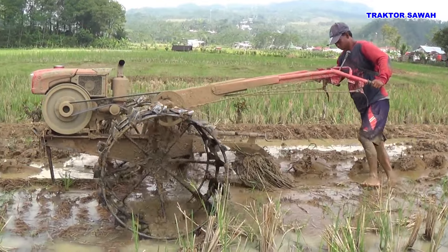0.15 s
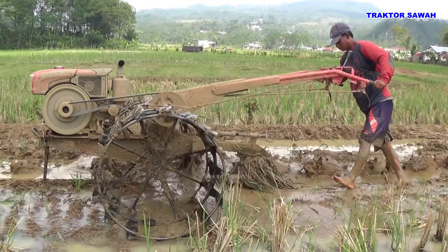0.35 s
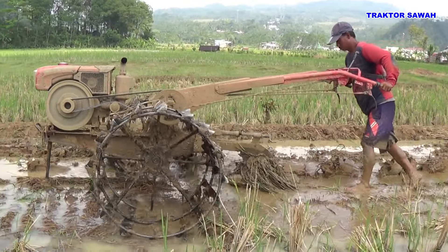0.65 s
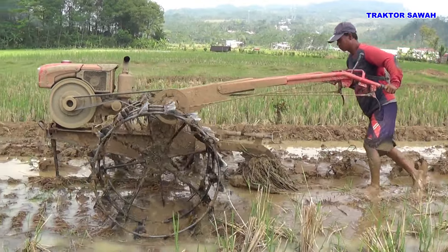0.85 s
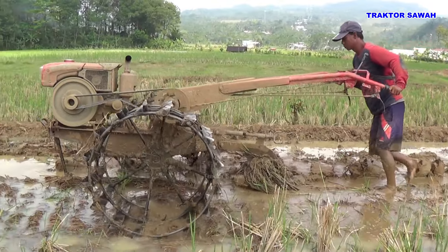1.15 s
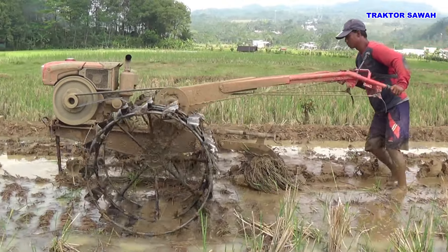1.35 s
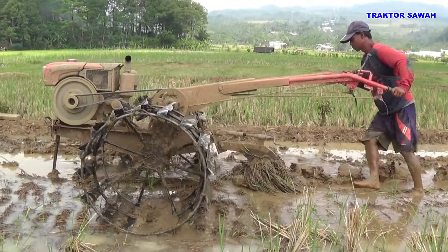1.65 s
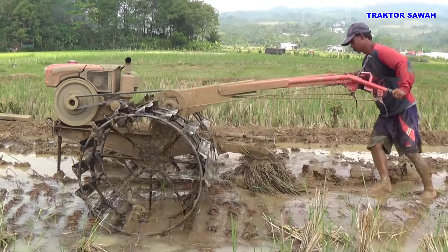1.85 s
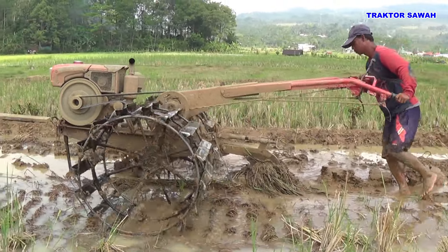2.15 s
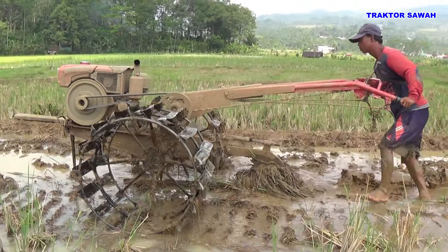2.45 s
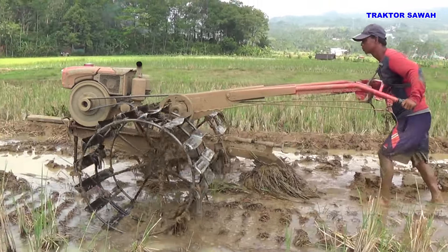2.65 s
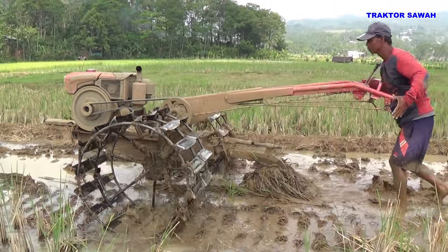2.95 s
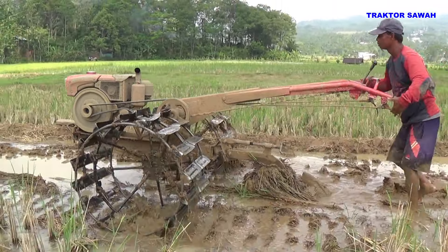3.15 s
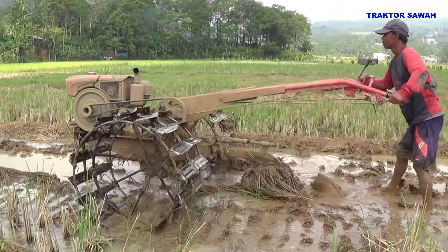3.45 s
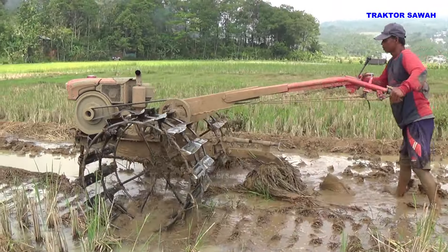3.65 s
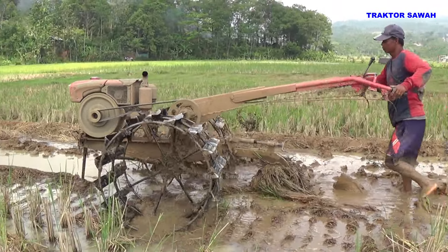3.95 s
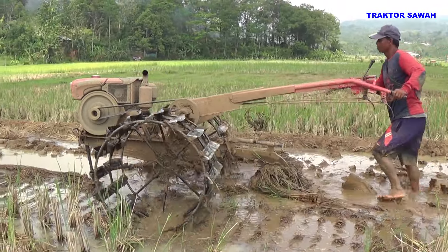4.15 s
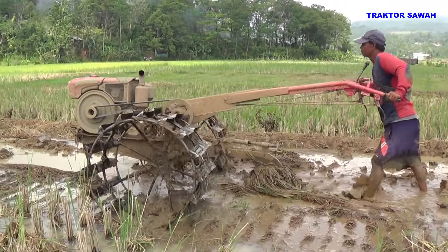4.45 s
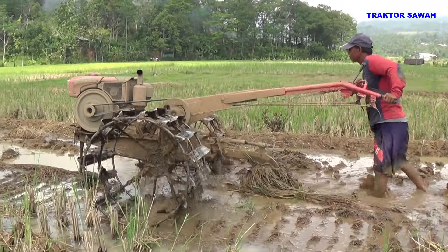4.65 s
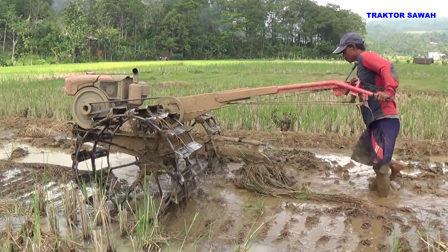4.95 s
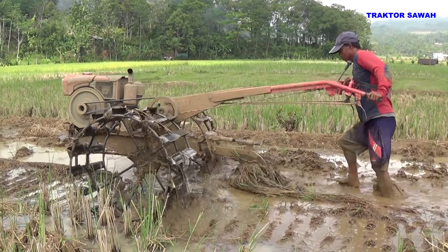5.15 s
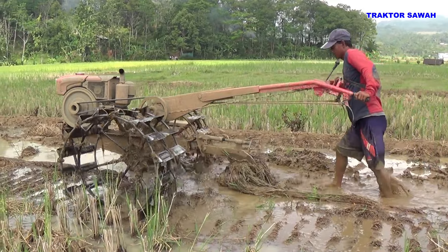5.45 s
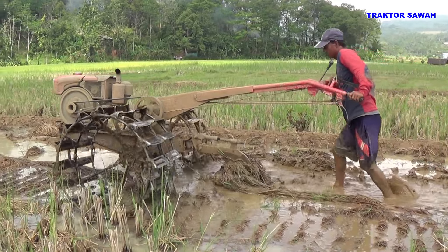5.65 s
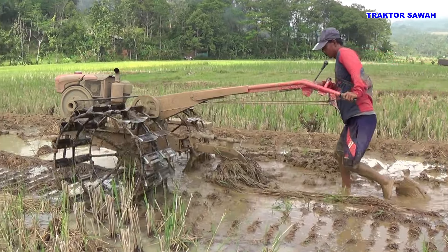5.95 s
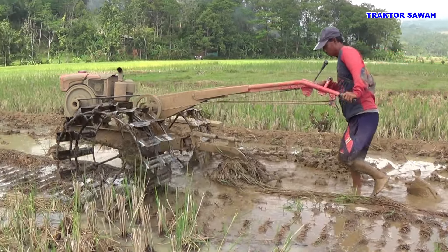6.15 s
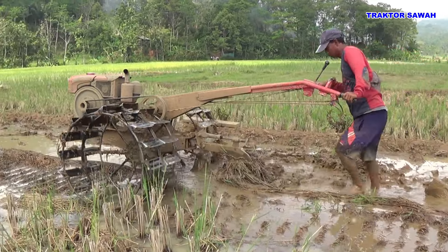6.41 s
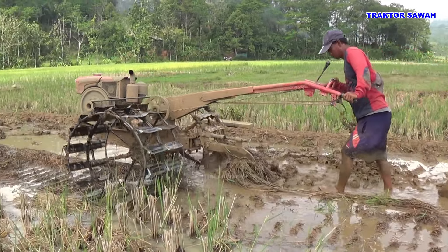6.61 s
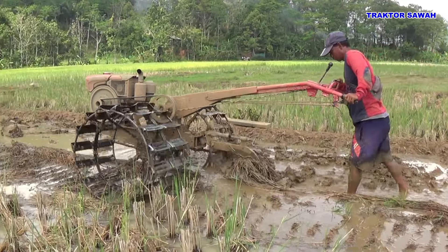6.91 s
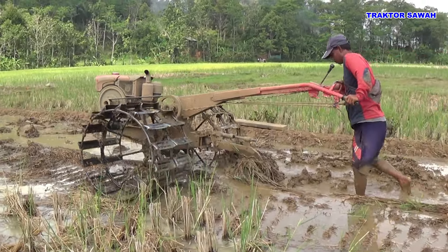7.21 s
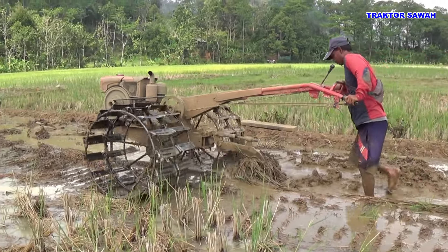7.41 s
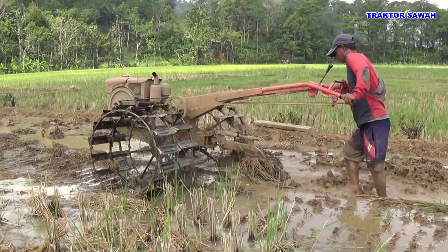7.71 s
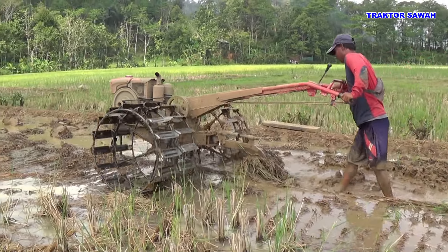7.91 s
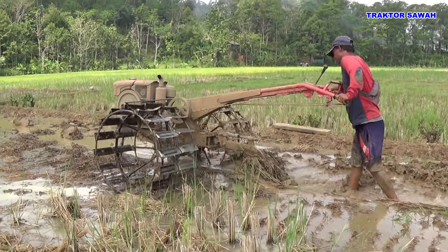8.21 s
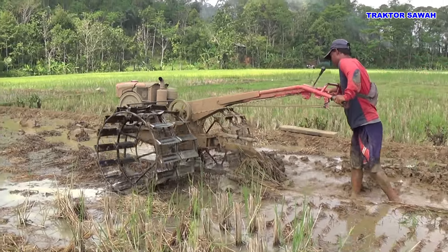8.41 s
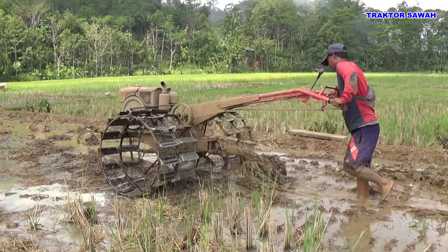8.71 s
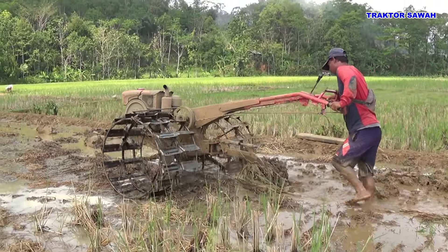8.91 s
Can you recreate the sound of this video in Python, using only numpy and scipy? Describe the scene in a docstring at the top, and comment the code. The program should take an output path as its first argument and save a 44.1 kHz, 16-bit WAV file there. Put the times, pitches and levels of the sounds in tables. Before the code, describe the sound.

Steady, fast chugging of a small one-cylinder diesel under load, already running and never stopping. Sharp combustion knocks alternate in strength above a rough bed of gear and valve-train clatter and a thin sheet-metal ring that slowly fades. Bursts of rattling steelwork cluster around three and four seconds; a clear clink follows near five. Intake gulps grow fuller towards the end. Open field, close microphone, almost no echo, light wind rumble.

```python
"""A hand tractor's single-cylinder four-stroke diesel labours through a flooded rice field, a few metres away.
From the start, filtered noise makes the clatter of gears and valve train, a sheet-metal ring and light wind.
About 6.7 times a second, mostly strong and weak by turns, the engine fires: enveloped tones and noise give
injector tick, knock, whistle, exhaust hiss and boom, then the gulp of the intake.
After a second and a half steelwork rattles in spells: random blows on noise, passed through steel resonances."""
import sys
import numpy as np
from scipy import signal
from scipy.fft import rfft, irfft, next_fast_len
from scipy.io import wavfile

SR = 44100
rng = np.random.default_rng(int(sys.argv[2]) if len(sys.argv) > 2 else 0)


def unload_audio(sound):
    """Save the sound as a 16-bit wav file, at the path given as the first command line argument."""
    columns = np.transpose(np.atleast_2d(sound))
    # keep every value between -1 and 1, then stretch to whole-number steps
    steps = np.round(np.clip(columns, -1, 1) * 32767)
    wavfile.write(sys.argv[1], SR, steps.astype(np.int16))


N = 399987
TIME = np.arange(N) / SR
AGE = np.arange(SR // 12) / SR  # time since a valve or a flame set something going, s

# Levels are relative: the functions add the state of each firing and fixed offsets.
# Wind spectrum: pitch_hz, density_db (per Hz)
WIND_SPECTRUM = [(15, -4), (40, 0), (80, -4), (200, -14), (600, -35), (2000, -70)]
# Gear noise, and treble noise of the valve train: pitch_hz, density_db (per Hz)
GEAR_SPECTRUM = [(100, -10), (180, -3), (290, -8), (410, -16.5), (520, -7), (680, -3), (780, -.5),
                 (920, -1.5), (1090, -10), (1350, -2.5), (1520, -7), (1900, -10), (2500, -10), (4000, -18),
                 (6000, -35)]
CHATTER_SPECTRUM = [(2000, -25), (3800, 0), (5000, .5), (6300, 0), (7500, -3.5), (9000, -1), (10200, 1),
                    (12000, -4.5), (14000, -15), (15800, -32)]
# Course of the clatter: time_s, body_db, treble_db
CLATTER_LEVEL = [(0.0, -26, -31), (0.68, -27, -35), (1.77, -26, -34), (2.09, -27, -35), (2.75, -25, -32),
                 (3.26, -26, -29), (3.71, -27, -36), (4.02, -25, -35), (4.14, -26, -32), (4.77, -28, -37),
                 (5.48, -29, -35), (6.29, -28, -37), (6.82, -29, -35), (9.07, -28, -37)]
# Steady ring of the engine's sheet metal: pitch_hz, density_db (per Hz)
PANEL_SPECTRUM = [(1000, -60), (1270, -12), (1355, 0), (1440, -12), (1800, -60)]
# The ring fades as the tractor moves on: time_s, level_db
PANEL_LEVEL = [(0, -33), (4.2, -33.5), (5.5, -39), (9.07, -44)]
# Resonances of thin steel parts: pitch_hz, width_hz, level_db
STEEL_MODES = [(4365, 60, -6), (6526, 30, -1), (7600, 50, -5), (8700, 70, -4), (9340, 60, -1),
               (10450, 60, -3), (11200, 60, -5), (12098, 30, -4), (13675, 25, 0), (13930, 40, -2)]

# Engine speed, sagging as the wheels dig in and surging as they come free: time_s, speed (firings per s)
SPEED = [(0.0, 6.686), (1.16, 6.539), (1.83, 6.702), (2.64, 6.637), (3.5, 6.797), (3.67, 7.193),
         (4.31, 6.666), (4.46, 6.892), (4.77, 6.749), (6.46, 6.774), (6.63, 6.915), (6.78, 6.702),
         (9.07, 6.613)]
# The governor hunts, overfeeding one firing and starving the next:
# time_s, depth (above 0 the even firings are strong, below 0 the odd)
HUNTING = [(0, .55), (.45, .8), (.8, .35), (1.9, 1), (2.8, .7), (3.45, .75), (3.75, 1.1), (3.9, .1),
           (4.5, 0), (4.76, -1.2), (5.06, -1), (5.36, -.25), (6, -1), (6.6, -1.15), (8.05, -.95),
           (8.35, -.5), (9.07, -.5)]
# Hardness of ignition: time_s, knock_db
HARDNESS = [(0, -15.5), (1.15, -15.5), (1.4, -17.7), (2.8, -17), (3.5, -19.5), (3.9, -16), (5.4, -15),
            (6.0, -18), (7.5, -17), (9.07, -17.3)]
# Load on the engine: time_s, power_stroke_db
LOAD = [(0, -22), (.33, -16.5), (.65, -16.5), (1.1, -21), (2.7, -22.5), (3.3, -25), (4.3, -26.5),
        (4.85, -22), (5.6, -29), (6.35, -22), (6.7, -25), (8.5, -24.5), (8.8, -21.5)]
# The intake turns towards the listener as the tractor passes: time_s, level_db
FACING = [(0, -3.5), (3, -3), (4, -1), (6, 0), (7.5, 1.5), (9.07, 3.5)]

# Resonances rung once a cycle:
# start_s (after firing), rise_s, hold_s, decay_s, pitch_hz, glide (Hz/s), width_hz, level_db
INJECTOR_MODES = [(-.006, .002, .004, .003, 10300, 0, 700, -37),
                  (-.006, .002, .004, .003, 12200, 0, 800, -41),
                  (-.006, .002, .004, .003, 14000, 0, 800, -44)]  # tick just before the firing
KNOCK_MODES = [(0, .0013, .005, .009, 1625, -7500, 70, .3), (0, .0015, .006, .007, 2750, 0, 100, -10),
               (0, .001, .003, .006, 3100, 0, 250, -18), (0, .002, .005, .011, 2050, 0, 300, -11),
               (.0005, .001, .005, .007, 860, 0, 90, -12), (.004, .004, .009, .012, 1320, 0, 60, -10)]  # combustion knock
WHISTLE_MODES = [(.012, .009, .008, .002, 2180, 3500, 60, -1),
                 (.011, .008, .009, .002, 4230, 10000, 110, -6)]  # tones that grow through the power stroke
HOUSING_MODES = [(.024, .005, .004, .01, 790, 0, 70, -25), (.094, .006, .008, .008, 840, 0, 60, -27.5),
                 (.036, .004, .004, .008, 3600, 0, 200, -36), (.06, .006, .008, .008, 2450, 0, 200, -38)]  # housing and valve gear
SPRING_MODES = [(.034, .001, .005, .007, 9500, 0, 500, -5), (.034, .001, .005, .006, 10900, 0, 600, -7),
                (.034, .001, .004, .005, 5800, 0, 300, -11)]  # valve gear and springs after the exhaust opens
INTAKE_BARK = [(.075, .002, .003, .004, 780, 0, 130, -21), (.078, .002, .003, .004, 560, 0, 100, -32)]
# Air columns: start_s (after firing), rise_s, hold_s, decay_s, first_hz, last_hz, level_db
EXHAUST_BOOM = (.037, .013, .006, .02, 70, 130, -21.2)
INTAKE_GULP = (.0778, .002, .004, .004, 215, 255, -22)
INTAKE_RING = (.118, .007, .002, .015, 156, 151, -25.5)
# Burning gas, exhaust jet and injection pump: pitch_hz, density_db (per Hz)
BURN_SPECTRUM = [(300, -35), (600, -10), (900, -3), (1100, -6), (1500, 1), (3000, -4), (4500, -11),
                 (7000, -21), (10000, -20), (15000, -38)]
BLOWDOWN_SPECTRUM = [(500, -30), (1500, -6), (2600, -1), (4700, -11), (5800, -4), (7100, -16), (8400, -4),
                     (9800, 0), (11500, -4), (13000, -13), (15500, -28)]
PUMP_SPECTRUM = [(900, -25), (1600, -3), (2250, 0), (3000, -9), (5000, -16), (7500, -20), (10300, -11),
                 (13000, -19), (15500, -27)]

# Spells of rattling steelwork: start_s, hold_s, level_db
RATTLE_SPELLS = [(1.58, .05, -29), (2.05, .02, -28), (2.46, .05, -25), (2.77, .08, -21), (2.87, .09, -24),
                 (3.07, .065, -18), (3.2, .03, -22), (3.24, .05, -26), (3.395, .028, -21),
                 (3.437, .032, -19), (3.497, .014, -19), (3.95, .04, -25), (4.012, .03, -17),
                 (4.06, .055, -21)]
# Rattle noise: pitch_hz, density_db (per Hz)
RATTLE_SPECTRUM = [(300, -20), (600, -4), (950, 1), (1150, -3), (1400, 0), (2000, -4), (3300, -5),
                   (5000, -9), (7500, -12), (10200, -6), (12500, -13), (15500, -26)]
# Single ticks of steel: start_s, level_db
CLINKS = [(2.5646, -18), (4.8214, -24), (5.1078, -11), (7.1044, -23), (8.1144, -27), (8.2494, -20)]

# Level difference of the two ports: pitch_hz, left_minus_right_db
LEAN = [(60, 0.0), (110, 0.5), (200, 0.5), (380, 0.0), (700, 3.0), (1290, 2.0), (2380, 1.3), (4400, 0.0),
        (8120, 0.5), (15000, 0.0)]
# Phase by which the left port leads: pitch_hz, lead_rad
LEAD = [(30, .3), (70, .7), (120, .85), (260, .75), (520, .65), (1030, .25), (1300, .4), (2500, .1),
        (15000, 0)]
# Sound thrown back from the sides: pitch_hz, level_db
SCATTER = [(60, -22), (250, -22), (700, -20), (3000, -16), (10000, -20)]

FIRING_COUNT, FIRST_FIRING_S = 61, .012
STARVED_KNOCK_DB, STARVED_STROKE_DB = -5, -5.5  # what a fully starved firing loses
# relative exhaust hiss of an evenly fed firing, and its change with the charge
HISS_DB, OVERFED_HISS_DB, STARVED_HISS_DB = -22.7, 3.8, -9.3
HURRY_S = .007  # a strong firing spins the crank up, so the starved one after it comes early
STARVED_LAG_S = .003  # extra ignition lag of a starved charge
USUAL_SPEED, LAG_S_PER_SPEED = 6.7, .01  # firings per s; a faster engine lights later
SLOW_CRANK_S, QUICK_CRANK_S = .0065, .0018  # valves move later when starved, earlier when full
LOW_CUT_HZ = 33  # the pipes are too small to radiate below this
TOP_HZ = 15800


def amp(db):
    """Decibels are a logarithmic measure of amplitude: convert to gain."""
    return 10 ** (np.asarray(db) / 20)


def unit(x):
    """Mean power fixes the effective amplitude: scale to rms 1."""
    return x / np.sqrt(np.mean(np.abs(x) ** 2) + 1e-20)


def along(points, hz):
    """Pitch is logarithmic in frequency: read (Hz, value) points on a log axis."""
    point_hz, value = np.transpose(points)
    return np.interp(np.log(hz + 1), np.log(point_hz), value)


def at_times(curve, s):
    """Linear interpolation: read (s, value) points at the given times."""
    return np.interp(s, *np.transpose(curve))


def filtered(x, response):
    """Linear filtering: multiply the spectrum of x by a complex response of frequency."""
    n = x.shape[-1]
    m = next_fast_len(n + 2048)
    return irfft(rfft(x, m) * response(np.fft.rfftfreq(m, 1 / SR)), m)[..., :n]


def wobble(rate, shape):
    """Slow random modulation: wandering curves of rms 1, with rate knots a second."""
    at = np.arange(np.prod(shape)) * (rate / SR)
    knots = rng.standard_normal(int(at[-1]) + 2)
    return unit(np.interp(at, np.arange(len(knots)), knots)).reshape(shape)


def noise(spectrum, grain_db):
    """Shaped random noise of rms 1, its amplitude modulated in millisecond grains."""
    grains = rng.standard_normal(N) * amp(grain_db * wobble(700, N))
    return unit(filtered(grains.astype(np.float32), lambda hz: amp(along(spectrum, hz)).astype(np.float32)))


def gate(rise, hold, decay, t=AGE):
    """Exponential damping: an envelope that opens, holds and dies away."""
    return np.clip(t / rise, 0, 1) * np.exp(-np.maximum(t - rise - hold, 0) / decay)


def vary(spread):
    """Cycle-to-cycle scatter: one random value for each firing."""
    return spread * rng.standard_normal((FIRING_COUNT, 1))


def place(sounds, times):
    """Superposition: sum short sounds, each at its time."""
    out = np.zeros(N + 2 * SR)  # a second to spare at each end
    for sound, s in zip(sounds, np.ravel(times)):
        out[SR + round(s * SR):][:len(sound)] += sound
    return out[SR:SR + N]


def air_column(times, level_db, pipe, settle):
    """Pipe resonance: a pressure wave swings in a pipe, its pitch settling as the valve moves."""
    start, rise, hold, decay, first_hz, last_hz, db = pipe
    turns = last_hz * AGE + (first_hz - last_hz) * settle * (1 - np.exp(-AGE / settle))
    swing = np.sin(2 * np.pi * turns * (1 + vary(.012)))
    return place(np.sqrt(2) * amp(db + level_db) * gate(rise, hold, decay) * swing, times + start)


def ring(times, level_db, modes, rough, spread_db):
    """Modal resonance: gliding tones, a little different in pitch and strength at every firing."""
    out, t = 0, AGE[:SR // 20]
    for start, rise, hold, decay, hz, glide, width_hz, db in modes:
        phase = 2 * np.pi * ((hz + vary(width_hz / 2)) * t + glide * t * t / 2) + vary(np.pi)
        tone = np.sin((phase + rough * wobble(3 * width_hz, phase.shape)).astype(np.float32))
        level = amp(db + level_db + vary(spread_db))
        out = out + place(level * gate(rise, hold, decay, t) * tone, times + start)
    return np.sqrt(2) * out


def taps(rate, spread_db, decay):
    """Random impacts: envelope, rms 1, of parts striking each other rate times a second."""
    chance = rng.random((int(rate * N / SR), 2))
    blows = np.bincount((chance[:, 0] * N).astype(int), amp(spread_db * chance[:, 1]), N)
    return unit(signal.lfilter([1], [1, -np.exp(-1 / (decay * SR))], blows))


def steel(x, ring_db):
    """Forced resonance: thin steel parts add their high modes to whatever shakes them."""
    def response(hz):
        modes = sum(amp(db) * 1j * hz * width / (centre ** 2 - hz ** 2 + 1j * hz * width)
                    for centre, width, db in STEEL_MODES)
        return 1 + amp(ring_db) * modes
    return filtered(x, response)


def firings():
    """Governor hunting: time, starvation (0 to about 1) and hiss dB of each firing."""
    number = np.arange(FIRING_COUNT)[:, None]
    firings_so_far = np.cumsum(at_times(SPEED, TIME)) / SR
    due = FIRST_FIRING_S + np.interp(number, firings_so_far, TIME)
    charge = at_times(HUNTING, due) * (-1) ** number
    overfed, starved = np.maximum(charge, 0), np.maximum(-charge, 0)
    hiss_db = HISS_DB + OVERFED_HISS_DB * overfed + STARVED_HISS_DB * starved
    return due - HURRY_S * starved, starved, hiss_db


def wind():
    """Turbulence: low noise of slowly wandering level, independent at the two ports."""
    level = amp(-57 + 4.5 * wobble(5, (2, N)))
    return level * np.array([noise(WIND_SPECTRUM, grain_db=1) for port in range(2)])


def clatter():
    """Impact noise: gears and valve train, shaken hardest after a strong power stroke."""
    s, body_db, treble_db = np.transpose(CLATTER_LEVEL)
    fired, _, hiss_db = firings()
    shake = place(amp(.45 * (hiss_db + 24) + vary(1.5)) * gate(.015, .04, .014), fired + .016)
    # the intake valve seats
    tappet = place(amp(vary(3)) * gate(.001, .002, .004), fired + .123 + vary(.003))
    body = amp(np.interp(TIME, s, body_db) - .7) * (1 + .5 * shake) * noise(GEAR_SPECTRUM, grain_db=1.8)
    ticking = .65 + .45 * taps(rate=120, spread_db=18, decay=.006)
    ticking = ticking * (1 + .75 * shake + .8 * tappet)
    treble = amp(np.interp(TIME, s, treble_db) - 2.8) * ticking * noise(CHATTER_SPECTRUM, grain_db=1.3)
    return body + steel(treble, ring_db=2.5)


def panel():
    """Plate resonance: the engine's sheet metal rings as narrow-band noise."""
    return amp(at_times(PANEL_LEVEL, TIME)) * noise(PANEL_SPECTRUM, grain_db=1)


def injector(s, weak):
    """Impact: the injector ticks just before each firing, louder before a weak one."""
    return ring(s, -5 + 6 * weak, INJECTOR_MODES, rough=.9, spread_db=3)


def knock(flame, knock_db):
    """Impulsive excitation: the sudden flame rings the combustion resonances."""
    return ring(flame, knock_db, KNOCK_MODES, rough=.5, spread_db=1.6)


def burn(flame, knock_db, stroke_db):
    """Combustion roar: gas rushes in a short burst, then through the power stroke."""
    burst = amp(knock_db - 9.5) * gate(.0005, .002, .003)
    push = amp(np.minimum(stroke_db, -24) - 1) * gate(.002, .026, .003)
    return place(burst + push, flame) * noise(BURN_SPECTRUM, grain_db=1.5)


def whistle(s, weak, stroke_db):
    """Gas resonance: rising tones, which fall away steeply below the hardest power strokes."""
    level_db = stroke_db + 1.4 * np.minimum(stroke_db + 20, 0) + .8
    low = ring(s, level_db + 2 * weak, WHISTLE_MODES[:1], rough=.3, spread_db=1.5)
    high = ring(s, level_db - 15 * weak, WHISTLE_MODES[1:], rough=.2, spread_db=1.5)
    return low + high


def housing(late, weak):
    """Structural resonance: housing and valve gear are rung once a cycle."""
    return ring(late, 1.5 * weak, HOUSING_MODES, rough=.6, spread_db=2.2)


def exhaust_hiss(s, hiss_db):
    """Jet noise: the valve cracks open, then the piston pushes the rest of the gas out."""
    jet = gate(.001, .007, .003) + amp(-18) * gate(.012, .01, .022)
    return place(amp(hiss_db + 1) * jet, s + .033) * noise(BLOWDOWN_SPECTRUM, grain_db=1.2)


def springs(s, hiss_db):
    """Free vibration: valve gear and springs jingle after the exhaust opens."""
    return ring(s, hiss_db, SPRING_MODES, rough=.8, spread_db=2)


def exhaust_boom(s, weak, facing_db):
    """Pipe resonance: the exhaust column booms at rising pitch, swinging negative first."""
    return -air_column(s - .0005 * weak, .2 * facing_db + vary(.6), EXHAUST_BOOM, settle=.019)


def intake(late, facing_db):
    """Pipe resonance: the intake barks and gulps, then its air column rings on."""
    bark = ring(late, .4 * facing_db, INTAKE_BARK, rough=.4, spread_db=1.8)
    gulp = air_column(late, facing_db + vary(.8), INTAKE_GULP, settle=.005)
    shut = air_column(late, .3 * facing_db + vary(1.1), INTAKE_RING, settle=.01)
    return bark + gulp + shut


def injection_pump(s, lag, weak):
    """Ignition lag: a weak charge lights late, so the pump is heard before its knock."""
    level = amp(-26.5 + vary(1.5)) * weak
    return place(level * gate(.002, .006, .004), s + lag - .009) * noise(PUMP_SPECTRUM, grain_db=2)


def engine():
    """Four-stroke cycle: each firing's charge and crank speed set its sounds."""
    s, weak, hiss_db = firings()
    lag = STARVED_LAG_S * weak + LAG_S_PER_SPEED * (at_times(SPEED, s) - USUAL_SPEED)
    flame = s + lag + .0012
    knock_db = at_times(HARDNESS, s) + STARVED_KNOCK_DB * weak
    stroke_db = at_times(LOAD, s) + STARVED_STROKE_DB * weak
    facing_db = at_times(FACING, s)
    # after a weak firing the crank turns slower, so the intake opens later
    late = s - QUICK_CRANK_S + SLOW_CRANK_S * weak
    combustion = knock(flame, knock_db) + burn(flame, knock_db, stroke_db) + whistle(s, weak, stroke_db)
    exhaust = exhaust_hiss(s, hiss_db) + springs(s, hiss_db) + exhaust_boom(s, weak, facing_db)
    injection = injector(s, weak) + injection_pump(s, lag, weak)
    return injection + combustion + housing(late, weak) + exhaust + intake(late, facing_db)


def steelwork():
    """Impact and resonance: frame and cage wheels rattle in spells and tick now and then."""
    spells = place([amp(db) * gate(.003, hold, .01, TIME[:SR // 5]) for _, hold, db in RATTLE_SPELLS],
                   np.array(RATTLE_SPELLS)[:, 0])
    ticks = place([amp(db - 11) * gate(.0003, .0006, .002) for _, db in CLINKS], np.array(CLINKS)[:, 0])
    # the play of a joint limits its hardest blow
    blows = np.tanh(.7 * taps(rate=300, spread_db=14, decay=.003))
    rattle = amp(1.5) * spells * (.1 + blows) * noise(RATTLE_SPECTRUM, grain_db=1.6)
    return steel(rattle + ticks * noise(CHATTER_SPECTRUM, grain_db=1.2), ring_db=4)


def scene():
    """Propagation: the tractor reaches two ports unequally, the field scatters a little, wind rumbles."""
    sources = clatter() + panel() + engine() + steelwork()
    tractor = filtered(sources, lambda hz: hz ** 3 / (hz ** 3 + LOW_CUT_HZ ** 3))
    sides = np.array([[1], [-1]])  # left, right
    direct = filtered(tractor, lambda hz: amp(sides * along(LEAN, hz) / 2)
                      * np.exp(.5j * sides * along(LEAD, hz)))
    # the scattered tail falls 60 dB in .2 s, opposite in sign at the two ports
    tail = rng.standard_normal(SR // 5) * amp(-60 * TIME[:SR // 5] / .2)
    scattered = filtered(tractor, lambda hz: amp(along(SCATTER, hz)))
    field = sides * signal.oaconvolve(scattered, tail / np.linalg.norm(tail))[:N]
    return direct + field + wind()


def record(dry):
    """Band limiting: nothing at or above TOP_HZ passes."""
    return filtered(dry, lambda hz: hz < TOP_HZ)


dry = scene()
out = record(dry)
unload_audio(out)
```